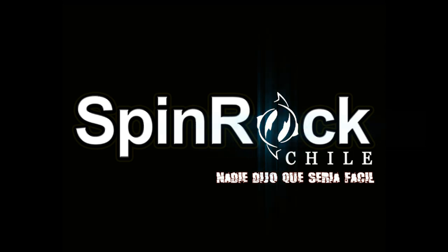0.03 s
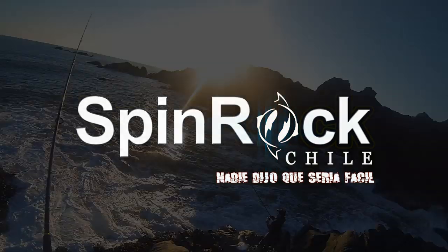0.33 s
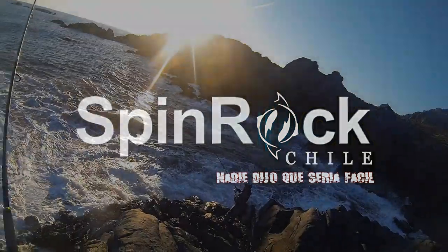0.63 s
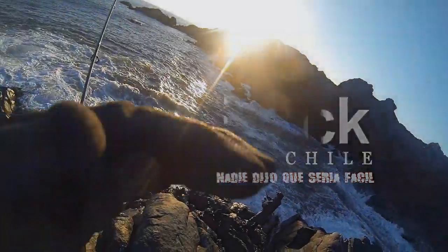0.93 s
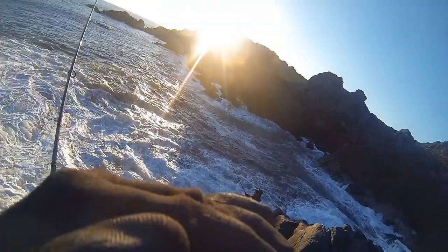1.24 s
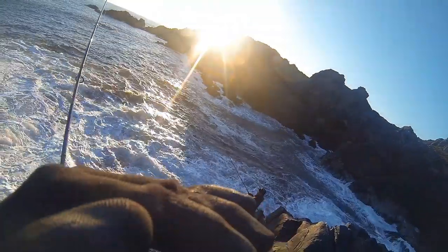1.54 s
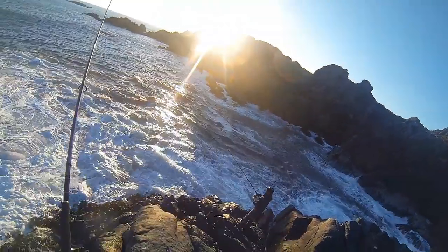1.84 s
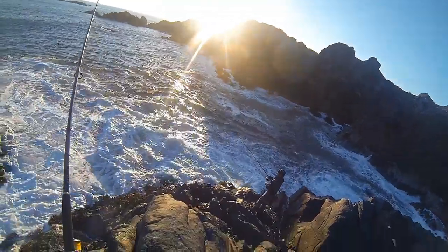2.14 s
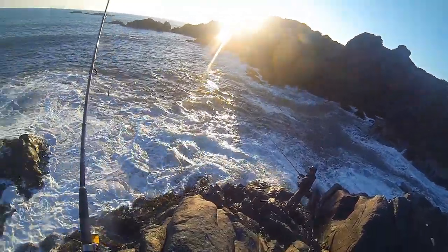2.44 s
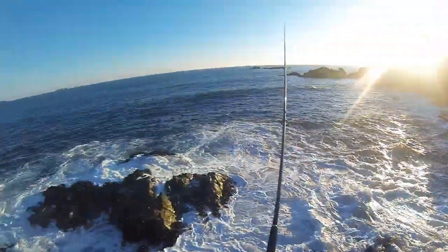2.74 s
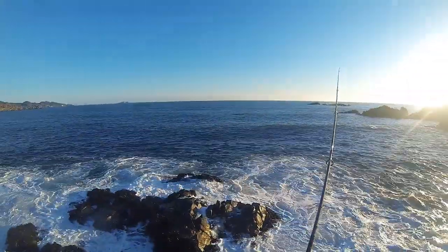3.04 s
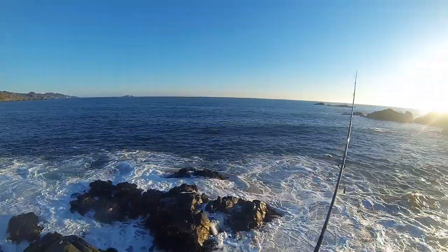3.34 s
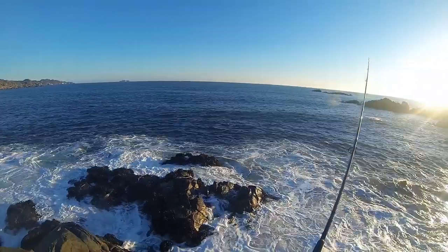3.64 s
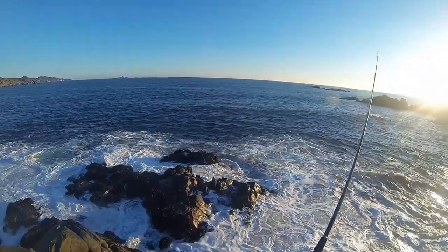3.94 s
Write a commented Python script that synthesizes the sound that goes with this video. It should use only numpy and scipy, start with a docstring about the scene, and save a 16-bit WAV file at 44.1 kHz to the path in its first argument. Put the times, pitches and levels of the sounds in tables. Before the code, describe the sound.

Surf fades in at about 0.4 seconds and washes steadily on a rocky shore, with a hollow ring from the microphone's case and low wind rumbling underneath. Just after 1 second, a hand rubs the case in a quick cluster of rising scrapes. The wash shifts slightly in tone around 2.5 seconds as the microphone turns seaward. Two deep wind puffs thump at about 3.1 and 3.6 seconds.

```python
"""Surf fades in on a rocky shore and washes steadily, with wind rumbling underneath.
The microphone sits in a closed camera case, whose air the surf keeps in a hollow ring.
About a second in, a hand rubs the case in four quick rising scrapes. The microphone then turns
from a foaming cove to the open sea, and near the end two puffs of wind thump the case."""
import sys
import numpy as np
from scipy import signal
from scipy.fft import rfft, irfft, next_fast_len
from scipy.io import wavfile
from scipy.ndimage import uniform_filter1d, map_coordinates

SR = 44100
rng = np.random.default_rng(int(sys.argv[2]) if len(sys.argv) > 2 else 0)


def store_pcm(level_fs):
    """Save levels as 16-bit WAV."""
    pcm = np.round(np.clip(level_fs, -1, 1) * 32767).astype(np.int16)
    wavfile.write(sys.argv[1], SR, np.atleast_2d(pcm).T)


N = 176400


def amp(db):
    """Decibels to gain."""
    return 10 ** (np.asarray(db) / 20)


def unit(x):
    """x scaled to rms 1."""
    return x / np.sqrt(np.mean(x ** 2) + 1e-20)


def curve(rows):
    """Rows of seconds and value, joined into one value per sample."""
    return np.interp(np.arange(N) / SR, *np.transpose(rows))


def wobble(rate):
    """A smooth random curve with rate knots a second."""
    knots = rng.standard_normal(int(N * rate / SR) + 4)
    return map_coordinates(knots, [np.arange(N) * rate / SR])


def filtered(x, response):
    """x filtered by a gain given as a function of Hz."""
    size = next_fast_len(N + SR // 2)
    return irfft(rfft(x, size) * response(np.fft.rfftfreq(size, 1 / SR)), size)[:N]


def shaped(x, colour):
    """x filtered by rows of Hz and dB, joined on a log frequency axis."""
    row_hz, db = np.transpose(colour)
    return filtered(x, lambda hz: amp(np.interp(np.log(hz + 1), np.log(row_hz + 1), db)))


def patchy_noise(spread_db):
    """White noise with patches of random gain in time and frequency."""
    spectra = signal.stft(rng.standard_normal(N), nperseg=512)[2]
    patches = uniform_filter1d(rng.standard_normal(spectra.shape), size=5, axis=0)
    patches = uniform_filter1d(patches, size=14, axis=1)
    return unit(signal.istft(spectra * amp(spread_db * unit(patches)), nperseg=512)[1][:N])


def even_noise(colour, samples):
    """Coloured noise with its chance swells flattened over a window of samples."""
    noise = unit(shaped(rng.standard_normal(N), colour))
    return noise / np.sqrt(np.abs(uniform_filter1d(noise ** 2, size=samples)) + 1e-9)


def gliding_noise(cycles, width):
    """A noise band that follows a running count of cycles; width is a share of the pitch."""
    knots = rng.standard_normal(size=(2, 512))
    a, b = (map_coordinates(row, [2 * width * cycles], mode="wrap") for row in knots)
    return unit(a * np.cos(2 * np.pi * cycles) + b * np.sin(2 * np.pi * cycles))


def surf():
    """Water rushes and foam bursts on the rocks; the colour shifts as the microphone turns seaward."""
    # The wash from each direction. Each row: frequency in Hz, relative spectral level in dB.
    cove_colour = [(60, -14.5), (200, 1), (330, -4), (500, -7.5), (950, -1.5), (1200, 6), (1750, -2.5),
                   (2000, -15), (2500, -13), (2750, -3), (3550, 0), (3950, -13), (4450, -22), (5100, -8.5),
                   (5600, -24), (6200, -24.5), (7100, -29), (7750, -19), (8700, -28.5), (11200, -29),
                   (13000, -40), (14000, -29), (15000, -46)]
    sea_colour = [(60, 2), (200, -0.5), (330, -3), (500, -6.5), (950, -11.5), (1250, -9.5), (1750, -6.5),
                  (2350, -10), (2700, -8.5), (2860, -14.5), (3000, -13.5), (3550, -11), (4020, -23),
                  (4500, -19.5), (5150, -18), (5600, -21.5), (6200, -23), (7100, -26.5), (8700, -29.5),
                  (11200, -31.5), (13000, -37), (15000, -41)]
    # Where the microphone points. Each row: time in seconds, share of open sea from 0 to 1.
    turn = [(1.9, 0.6), (2.4, 0.53), (2.85, 0.93), (3.2, 0.9)]
    # Strength of the surf. Each row: time in seconds, level in dB.
    swell = [(.8, -49.5), (1.2, -47), (1.6, -46), (2.2, -46), (2.6, -47.5), (3.1, -49), (3.6, -48),
             (4, -48.5)]
    bursts_per_s, foam_db = 500, -13
    foam = (rng.random(N) < bursts_per_s / SR) * rng.standard_normal(N)
    water = unit(patchy_noise(spread_db=0.98) + amp(foam_db) * unit(foam))
    seaward = np.clip(curve(turn), 0, 1)
    wash = (1 - seaward) * unit(shaped(water, cove_colour)) + seaward * unit(shaped(water, sea_colour))
    return wash * amp(curve(swell) + 0.3 * wobble(rate=9))


def case_ring():
    """The roar of the surf keeps the air ringing around the microphone in its case."""
    # Air resonances of the case. Each row: centre in Hz, width in Hz, relative level in dB.
    modes = [(1322, 112, -1.5), (1446, 116, -2), (1516, 138, 2), (1639, 126, -5), (2093, 104, -15.5),
             (10120, 220, -38)]
    # Strength of the ring. Each row: time in seconds, level in dB.
    ring_level = [(.8, -46.5), (1.15, -44), (1.45, -43.5), (1.68, -44), (2.0, -43.5), (2.33, -41.5),
                  (2.6, -44), (2.85, -41.5), (3.05, -42), (3.3, -42), (3.45, -44), (3.72, -40), (4, -42.5)]

    def resonance(hz):
        """Gain of the case, its modes summed in power."""
        powers = (amp(db) ** 2 / (1 + 2 * ((hz - centre) / width) ** 2) ** 2.51
                  for centre, width, db in modes)
        return np.sqrt(sum(powers))

    ring = unit(filtered(patchy_noise(spread_db=1.0), resonance))
    return ring * amp(curve(ring_level) + 0.77 * wobble(rate=10))


def wind():
    """Wind right on the case: a deep rumble with a lumpy flutter above it."""
    # The two bands of wind noise. Each row: frequency in Hz, relative spectral level in dB.
    rumble_colour = [(8, -5), (18, 0), (28, 3.5), (39, -7.5), (52, -14), (75, -24.5), (100, -41),
                     (160, -44), (300, -70), (700, -120)]
    flutter_colour = [(30, -2), (70, 3), (120, 0.5), (170, -12.5), (280, -19.5), (600, -50), (1500, -120)]
    # Gusting in each band. Each row: time in seconds, level in dB.
    rumble_level = [(.4, -31), (.58, -38.5), (.7, -29), (1.02, -27.5), (1.15, -36), (1.7, -37),
                    (1.92, -29.5), (2.2, -32.5), (2.4, -40), (2.65, -31.5), (3.0, -35), (3.12, -34.5),
                    (3.3, -26.5), (3.45, -38), (3.58, -33), (3.72, -34), (4, -36)]
    flutter_level = [(.7, -55), (1.1, -58), (1.6, -57), (2.0, -49), (2.4, -52), (2.72, -42.5),
                     (2.92, -49.5), (3.07, -42.5), (3.14, -32.5), (3.21, -54.5), (3.45, -48), (3.62, -44),
                     (3.72, -48.5), (4, -50.5)]
    rumble = even_noise(rumble_colour, samples=6000)
    rumble *= amp(curve(rumble_level) + 1.7 * wobble(rate=8))
    flutter = even_noise(flutter_colour, samples=4000)
    flutter *= amp(curve(flutter_level) + 0.71 * wobble(rate=21.93))
    return rumble + flutter


def hand_scrapes():
    """A hand slips on the case, close to the microphone: each zip swells, climbs, then sticks at once."""
    # Each row, one slip: end in seconds, length in seconds, gain in dB, first and last pitch in Hz.
    slips = [(1.062, 0.027, -36.5, 2410, 6960), (1.084, .026, -36, 857, 7630),
             (1.123, .022, -33.5, 2454, 8190), (1.147, 0.031, -43.5, 2273, 8100)]
    # Tone of the rubbing. Each row: frequency in Hz, gain in dB.
    scrape_colour = [(200, -2), (600, 1), (2000, 2), (4000, -3), (7500, -3.5), (9400, -8.5), (10500, -24),
                     (12500, -22), (15000, -28)]
    rise_s, stick_s = 0.012, 0.0027
    grit_db, rasp_db = -3, -3
    out, t = np.zeros(N), np.arange(N) / SR
    for end, length, db, first_hz, last_hz in slips:
        sliding = (t > end - length) & (t < end)
        age = t[sliding] - end + length
        cycles = np.cumsum(first_hz * (last_hz / first_hz) ** (age / length)) / SR
        rasp = amp(rasp_db) * rng.standard_normal(N)[sliding] * np.sqrt(age / length)
        rub = gliding_noise(cycles, width=0.28)
        grit = amp(grit_db) * gliding_noise(cycles, width=0.7)
        envelope = np.minimum(age / rise_s, 1) * np.minimum((length - age) / stick_s, 1)
        out[sliding] += amp(db) * envelope * (unit(rub + grit) + rasp)
    return shaped(out, scrape_colour)


def wind_puffs():
    """Each puff swells as a deep swing, breaks with a knock on the case, holds and dies away."""
    # Each row, one puff: time of the break in seconds, peak level in dB, pitch in Hz.
    puffs = [(3.133, -19, 36.2), (3.601, -16, 31.5)]
    lead_s, hold_s, t60_s = 0.024, 0.027, 0.13
    snap_hz, snap_s = 80, 0.0015  # the pitch leaps up briefly as the eddy breaks
    knock_db, knock_hz, knock_s = -22, 250, 0.0034
    out = np.zeros(N)
    for break_s, db, hz in puffs:
        t = np.arange(N) / SR - break_s
        cycles = hz * t + snap_hz * snap_s * np.tanh(t / snap_s)
        rise = np.exp(np.minimum(t, 0) / lead_s)
        decay = amp(-60 * np.maximum(t - hold_s, 0) / t60_s)
        knock = amp(knock_db) * np.exp(-(t / knock_s) ** 2) * np.cos(2 * np.pi * knock_hz * t)
        out += amp(db) * (rise * decay * np.sin(2 * np.pi * cycles) + knock)
    return out


def scene():
    """Sea, wind and hand at one microphone on the shore."""
    return (surf() + case_ring() + wind() + hand_scrapes() + wind_puffs())[None]


def record(dry):
    """After a moment of silence the sound fades in; the highest treble is cut off."""
    fade_start_s, fade_end_s, top_hz = 0.34, 0.75, 15200
    fade = np.interp(np.arange(N) / SR, [fade_start_s, fade_end_s], [0.041, 1], left=0)
    return filtered(dry[0] * fade, lambda hz: hz < top_hz)[None]


dry = scene()
out = record(dry)
store_pcm(out)
```